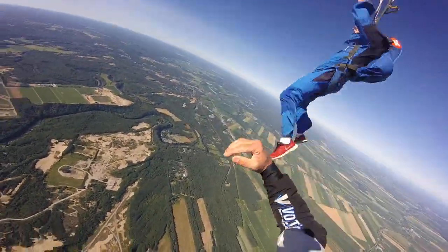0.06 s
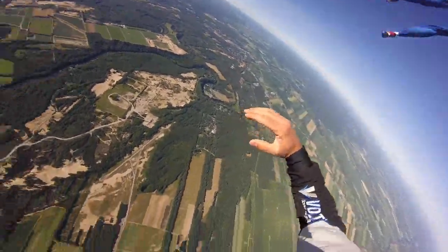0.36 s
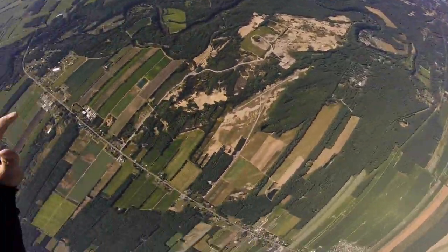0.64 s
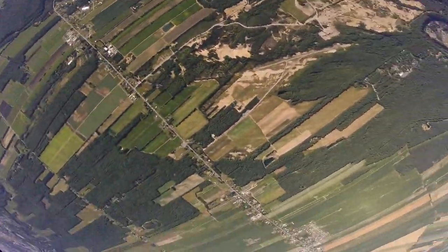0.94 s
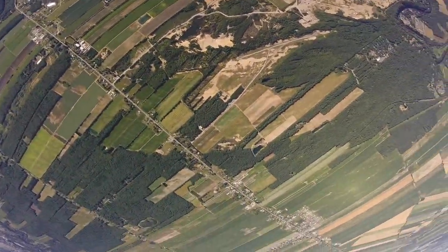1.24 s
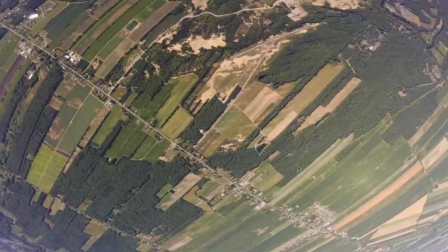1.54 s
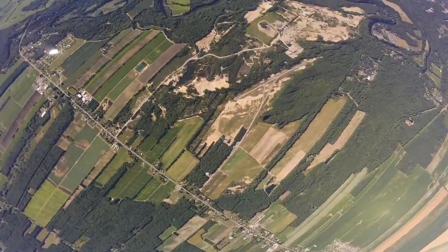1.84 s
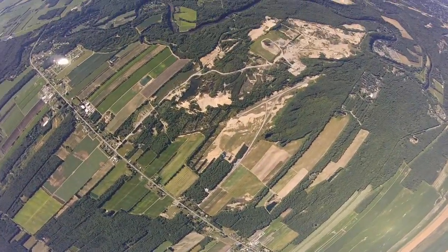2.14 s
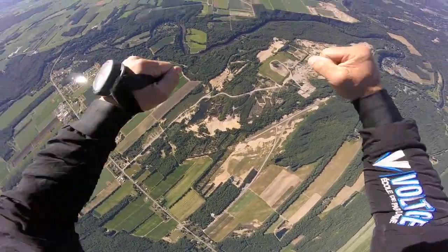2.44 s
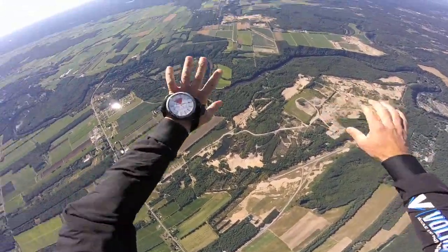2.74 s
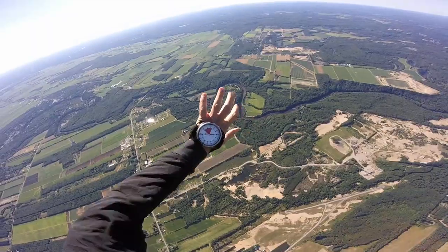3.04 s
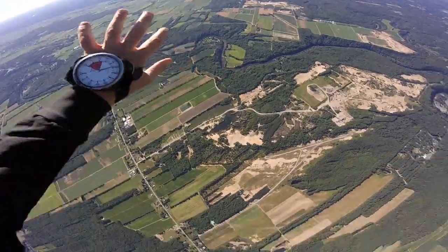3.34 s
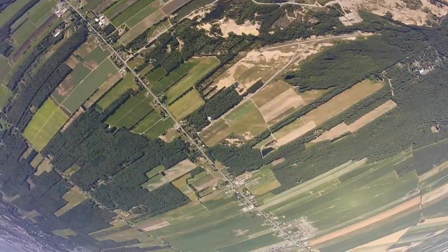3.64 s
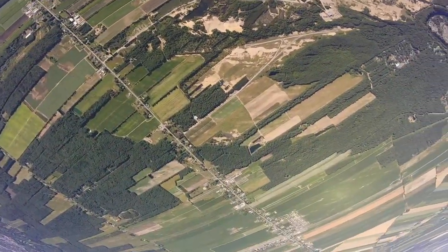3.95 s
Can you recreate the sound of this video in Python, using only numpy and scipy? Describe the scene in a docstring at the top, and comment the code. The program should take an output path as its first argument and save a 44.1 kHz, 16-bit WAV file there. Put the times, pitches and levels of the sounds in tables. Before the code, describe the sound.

Strong wind rushes past a microphone worn by a skydiver in freefall, opening with slapping gusts and low thumps. From 0.6 seconds the air tears by steadily over a buffeting rumble, with a howl strongest from 2 to 2.6 seconds. The rush then dulls and flutters as the buffeting grows and thumps hit the microphone. From 3.6 seconds the buffeting recedes and the rush turns bright.

```python
"""Freefall, heard from a small camera worn by a skydiver. At first the flow is broken and gusts slap by.
From 0.6 s air tears steadily past the housing and rushes in its resonances, while eddies buffet the
microphone port and rumble in a low cavity; grazing air adds a howl, strongest from 2 to 2.6 s.
Then, as the body turns or the arms come forward, the flow breaks up: the rush dulls and flutters,
the buffeting grows and big eddies thump. From 3.6 s the buffeting recedes and the rush is bright."""
import sys
import numpy as np
from scipy import signal
from scipy.fft import rfft, irfft
from scipy.io import wavfile
from scipy.ndimage import uniform_filter1d, minimum_filter1d, map_coordinates

SR = 44100
rng = np.random.default_rng(int(sys.argv[2]) if len(sys.argv) > 2 else 0)


def wav_record(signal):
    """Record a signal, one row per channel, as 16-bit PCM in the file named by sys.argv[1]."""
    frames = np.transpose(np.atleast_2d(signal))
    bounded = np.clip(frames, -1, 1)
    # unit amplitude maps onto the largest positive 16-bit level
    quanta = np.round(bounded * 32767).astype(np.int16)
    wavfile.write(sys.argv[1], SR, quanta)


N = 176400
TIME = np.arange(N) / SR
HZ = np.fft.rfftfreq(N, 1 / SR) + 1e-3

# Base levels of the rush: time_s, lower_resonance_db, upper_resonance_db, hiss_db
RUSH_LEVELS = [(0.0, -25.5, -23, -55.5), (0.14, -24.5, -28, -58.5), (0.29, -22, -19, -44),
               (0.38, -22.5, -20, -50), (0.47, -27.5, -17, -46.5), (0.52, -27, -24, -41),
               (0.56, -17.5, -20.5, -40), (0.98, -18, -19.5, -39), (1.2, -18, -18.6, -37.5),
               (1.62, -18.5, -17.5, -37), (1.93, -18.0, -19.7, -38), (2.0, -18.3, -20.5, -40.5),
               (2.11, -19.5, -21.5, -40.5), (2.25, -17.3, -20, -40), (2.56, -18, -21.5, -41.5),
               (2.6, -22, -23, -43.5), (2.83, -23.5, -21.5, -45.5), (3.05, -27.5, -28, -58),
               (3.25, -25, -24.5, -50.5), (3.48, -19, -22.5, -43), (3.58, -20, -22.1, -39.2),
               (3.63, -17.6, -18.5, -38), (3.76, -19.5, -15.2, -35.5), (4.0, -19, -16.5, -35.5)]
# Base levels of the buffeting: time_s, rumble_db, cavity_note_db, roar_db
BUFFET_LEVELS = [(0.0, -39, -22, -28.5), (0.18, -23.5, -22.5, -26.5), (0.38, -25.5, -26, -27),
                 (0.48, -31.5, -33.5, -32), (0.66, -23.5, -24, -24), (1.0, -29.8, -22.5, -31),
                 (1.4, -28.0, -25.5, -30), (1.82, -28, -25.5, -29), (1.95, -25.5, -21.0, -25),
                 (2.35, -27.5, -22.5, -25), (2.65, -22, -17, -25), (3.05, -23.0, -21.5, -24.5),
                 (3.5, -23, -16, -23), (3.6, -31.5, -28.5, -32.5), (3.75, -33.5, -29.5, -35),
                 (4.0, -31.7, -34.5, -37)]
# How broken the flow is, before each band's weighting: time_s, flutter_depth_db
FLUTTER_DEPTH = [(0, 3), (.48, 2.8), (.6, 1.05), (1.8, -0.25), (2.55, 0.5), (2.62, 1.2), (3.15, 3.5),
                 (3.55, 0.8), (4, -0.9)]
# How obliquely air meets the housing (0 head-on, 1 grazing): time_s, grazing_fraction
FLOW_GRAZING = [(0, 0.51), (.5, 0.43), (.6, 0.84), (.88, 0.85), (1.0, 0.07), (1.9, 0.04), (1.97, 0.95),
                (2.55, 1), (2.62, 0.49), (3.5, .6), (3.65, 0.01), (4, 0)]
# Gusts in the rush, before each band's weighting: centre_s, length_s, body_lift_db, treble_lift_db
GUST_SWELLS = [(0.031, .016, 3, 4), (0.111, 0.017, 9.5, 14), (0.169, 0.023, 9.5, 14.5),
               (0.209, 0.009, 6, 9), (0.236, 0.037, 4.5, 5), (0.268, 0.017, 6, -5), (0.318, 0.041, 4.5, -1),
               (0.422, 0.017, 9.5, 5), (.499, 0.01, 5, 5), (2.924, 0.0063, 3, 19), (3.172, 0.0067, -4, 0),
               (3.284, 0.007, 8.5, 9)]
# Lulls where the flow lets go, weighted like the gusts: centre_s, length_s, drop_db
FLOW_LULLS = [(0.343, 0.015, 3), (0.457, .012, 7), (.522, 0.011, 2), (2.088, 0.02, 6), (2.591, 0.024, 1.5),
              (3.036, 0.0088, 5), (3.883, 0.089, 1.5)]
# Spectrum of air noise in the housing: frequency_hz, density_db
HOUSING_SPECTRUM = [(500, -9.5), (700, -14.5), (830, -17), (940, -11.5), (1020, -19), (1190, -4),
                    (1340, -2), (1490, 2.5), (1700, -3), (2120, -9.5), (2430, 0.5), (2580, 2), (2800, -2.5),
                    (3140, -10), (3700, -11.5), (4080, -11.5), (4450, -18), (4850, -28), (5150, -26.5),
                    (5590, -17), (6330, -13.5), (6520, -21), (6860, -27), (8210, -29), (9000, -33.5),
                    (9580, -39), (10500, -41.5), (11100, -43), (12800, -44.5), (15000, -51)]
# Spectrum of the buffeted cavity: frequency_hz, density_db
CAVITY_SPECTRUM = [(10, -17), (22, -4), (43, 0), (70, 1.5), (100, 4), (175, -5), (230, -6), (313, -10),
                   (400, -9), (470, -9.5), (590, -20.5), (800, -27), (1200, -22)]
# Narrow modes of the housing, relative to their drive: pitch_hz, width_hz, level_db
HOUSING_MODES = [(3575, 130, -18.5), (6340, 110, -22.5), (10450, 330, -38.5)]
# Big eddies striking the port: centre_s, pitch_hz, peak_db
EDDY_THUMPS = [(0.019, 70, -10), (0.169, 127, -8.5), (0.259, 130, -21), (0.559, 116, -15),
               (1.051, 131, -15), (1.66, 125, -14), (2.07, 114, -13), (2.378, 135, -13), (2.453, 143, -9.5),
               (2.577, 140, -7), (2.691, 115, -15), (2.845, 109, -10), (2.942, 109, -12.5),
               (3.014, 90, -13), (3.164, 130.1, -9), (3.405, 109, -14)]

LOWER_TOP_HZ, UPPER_TOP_HZ, EDGE_TOP_HZ = 2053, 3400, 6940   # band limits of the rush
RUMBLE_TOP_HZ, BOOM_LOW_HZ, BOOM_TOP_HZ, ROAR_TOP_HZ = 113, 157.5, 315, 1200
LOWER_FLATTENING, EDGE_FLATTENING = .04, .022   # share of pitch lost in fully grazing air
FLUTTER_HZ, CRACKLE_HZ, CRACKLE_DB = 59, 660, 0.7
BROKEN_DB = 2.5   # flutter depth at which the narrow modes ring fully
THUMP_LENGTH_S, FADE_S, CUTOFF_HZ = .018, .002, 15250


def from_db(db):
    """Amplitude grows tenfold for every 20 dB."""
    return 10 ** (np.asarray(db) / 20)


def in_time(rows):
    """Linear interpolation gives each column of a curve at every sample."""
    times_s, *columns = np.transpose(rows)
    return [np.interp(TIME, times_s, column) for column in columns]


def swell(centre_s, length_s):
    """A Gaussian pulse of height 1, length_s wide at half height."""
    return .5 ** ((2 * (TIME - centre_s) / length_s) ** 2)


def drift(rate_hz):
    """Band-limited noise of rms 1 fluctuates mostly between a tenth of rate_hz and rate_hz."""
    spectrum = rfft(rng.standard_normal(N))
    wander = irfft(spectrum * HZ / (HZ + rate_hz / 10) / (1 + (HZ / rate_hz) ** 2), N)
    return wander / np.sqrt(np.mean(wander ** 2) + 1e-20)


def band(spectrum, low_hz, high_hz):
    """A steep band-pass response isolates one stretch of a spectrum."""
    frequency_hz, density_db = np.transpose(spectrum)
    gain = from_db(np.interp(np.log(HZ), np.log(frequency_hz), density_db))
    return gain / np.sqrt((1 + (low_hz / HZ) ** 24) * (1 + (HZ / high_hz) ** 24))


def resonance(centre_hz, width_hz):
    """Two like resonators in cascade: the gain falls to a third about width_hz off centre."""
    return 1 / (1 + 2 * ((HZ - centre_hz ** 2 / HZ) / (2 * width_hz)) ** 2)


def air_noise(gain, steady_s):
    """Source and filter: white noise is shaped by a gain, then divided by its running rms."""
    noise = irfft(rfft(rng.standard_normal(N)) * gain, N)
    size = max(int(steady_s * SR), 2)
    power = uniform_filter1d(uniform_filter1d(noise ** 2, size), size)
    return noise / np.sqrt(power + 1e-20)


def detune(noise, speed):
    """Time scaling: reading a noise at a changing speed moves its frequencies in proportion."""
    return map_coordinates(noise, [np.cumsum(speed)], order=3, mode="wrap")


def rush(flutter_db, grazing):
    """Broadband excitation: fast air drives the housing resonances; gusts and flutter modulate them."""
    lower_db, upper_db, hiss_db = in_time(RUSH_LEVELS)
    lull_db = sum(db * swell(s, length) for s, length, db in FLOW_LULLS)
    body_db = sum(db * swell(s, length) for s, length, db, _ in GUST_SWELLS) - lull_db
    treble_db = sum(db * swell(s, length) for s, length, _, db in GUST_SWELLS) - lull_db
    lower = air_noise(band(HOUSING_SPECTRUM, 620, LOWER_TOP_HZ), steady_s=.032)
    lower = detune(lower, 1 - LOWER_FLATTENING * grazing)
    lower *= from_db(lower_db - .53 + .66 * body_db + .57 * flutter_db + .68 * drift(41))
    # Smooth fast flow fills the hollow between the two resonances.
    fill = air_noise(resonance(centre_hz=1986, width_hz=470), steady_s=.069)
    fill *= from_db(2.5 + .53 * hiss_db + .47 * lower_db + .31 * flutter_db)
    upper = air_noise(band(HOUSING_SPECTRUM, LOWER_TOP_HZ, UPPER_TOP_HZ), steady_s=.069)
    upper *= from_db(upper_db - .64 + body_db + .61 * flutter_db + 1.24 * drift(34))
    # The edge lies between the upper resonance and the hiss, and follows both.
    edge_db = 5.5 + .7 * hiss_db + .3 * upper_db
    edge = air_noise(band(HOUSING_SPECTRUM, UPPER_TOP_HZ, EDGE_TOP_HZ), steady_s=.12)
    edge = detune(edge, 1 - EDGE_FLATTENING * grazing)
    edge *= from_db(edge_db + .8 * treble_db + 1.18 * flutter_db + .31 * drift(120))
    sizzle = air_noise(resonance(centre_hz=10360, width_hz=590), steady_s=.05)
    sizzle *= from_db(-10 - 7 * grazing)
    hiss = air_noise(band(HOUSING_SPECTRUM, EDGE_TOP_HZ, SR / 2), steady_s=.04) + sizzle
    hiss *= from_db(hiss_db + 1.4 + .8 * treble_db + flutter_db)
    crackle = from_db(CRACKLE_DB * drift(CRACKLE_HZ))
    return (lower + fill + upper + edge + hiss) * crackle


def buffeting(depth_db, flutter_db, grazing):
    """Cavity resonance: eddies on the port drive a rumble and a throbbing note; grazing air howls."""
    rumble_db, note_db, roar_db = in_time(BUFFET_LEVELS)
    rumble = air_noise(band(CAVITY_SPECTRUM, 12, RUMBLE_TOP_HZ), steady_s=.1)
    rumble *= from_db(rumble_db + .7)
    note = air_noise(resonance(centre_hz=126.8, width_hz=29.7), steady_s=.19)
    note *= from_db(note_db - 1)
    mean_db = (rumble_db + note_db + roar_db) / 3
    boom = air_noise(band(CAVITY_SPECTRUM, BOOM_LOW_HZ, BOOM_TOP_HZ), steady_s=.18)
    boom *= from_db(mean_db - 3 + depth_db + .69 * flutter_db)
    roar_gain = from_db(roar_db - .63 + .5 * flutter_db + .85 * drift(40))
    roar = roar_gain * air_noise(band(CAVITY_SPECTRUM, BOOM_TOP_HZ, ROAR_TOP_HZ), steady_s=.062)
    howl = air_noise(resonance(centre_hz=489, width_hz=75), steady_s=.025)
    howl *= from_db(roar_db - 2 - 18.5 * (1 - grazing))
    return rumble + note + boom + roar + howl


def housing_rings(depth_db, flutter_db):
    """Forced vibration: broken flow rings narrow modes of the housing, which fade as it smooths."""
    _, upper_db, _ = in_time(RUSH_LEVELS)
    drive_db = upper_db + flutter_db - np.maximum(BROKEN_DB - depth_db, 0)
    modes = sum(from_db(db) * air_noise(resonance(hz, width_hz), steady_s=.056)
                for hz, width_hz, db in HOUSING_MODES)
    return from_db(drive_db) * modes


def eddy_thumps():
    """Pressure transients: each big eddy swings the pressure at the port in a short wave packet."""
    phases = rng.uniform(0, 2 * np.pi, len(EDDY_THUMPS))
    return sum(from_db(db) * swell(s, THUMP_LENGTH_S) * np.sin(2 * np.pi * hz * (TIME - s) + phase)
               for (s, hz, db), phase in zip(EDDY_THUMPS, phases))


def scene():
    """Superposition: the sources add, and one turbulent flutter shakes rush, buffeting and rings."""
    depth_db, = in_time(FLUTTER_DEPTH)
    grazing, = in_time(FLOW_GRAZING)
    flutter_db = depth_db * drift(FLUTTER_HZ)
    air = rush(flutter_db, grazing) + buffeting(depth_db, flutter_db, grazing) + eddy_thumps()
    return (air + housing_rings(depth_db, flutter_db))[None]


def record(dry):
    """Peak limiting: a fast gain dip holds the peaks; the ends fade and a low-pass cuts the top."""
    gain = np.minimum(1, .88 / (np.abs(dry) + 1e-9))
    gain = uniform_filter1d(minimum_filter1d(gain, size=220), size=220)
    fade = np.minimum(1, np.minimum(TIME, TIME[::-1]) / FADE_S)
    low_pass = signal.ellip(12, .1, 90, CUTOFF_HZ, fs=SR, output="sos")
    return signal.sosfilt(low_pass, dry * gain * fade)


dry = scene()
out = record(dry)
wav_record(out)
```